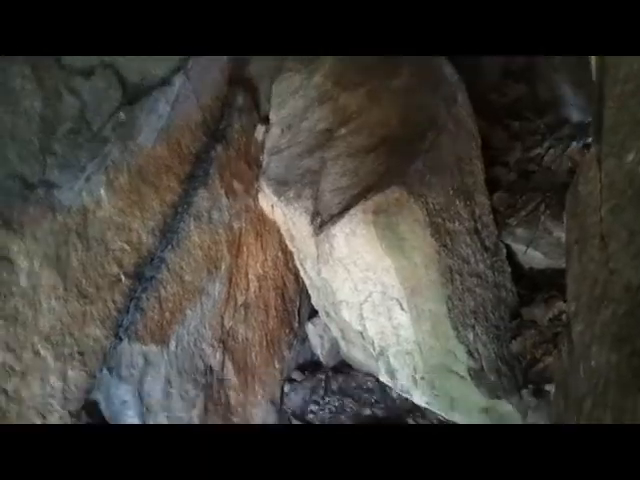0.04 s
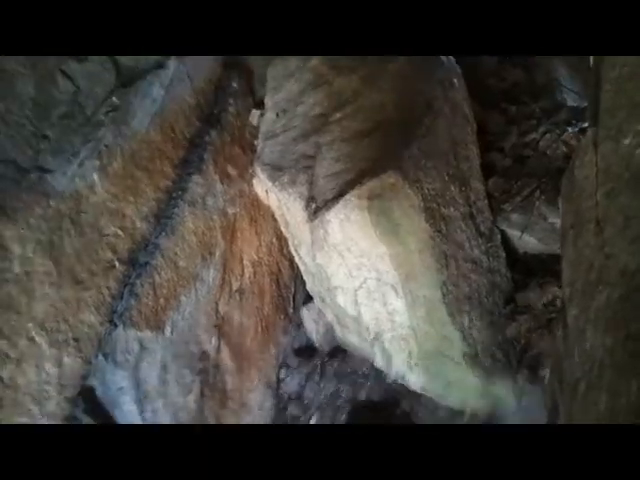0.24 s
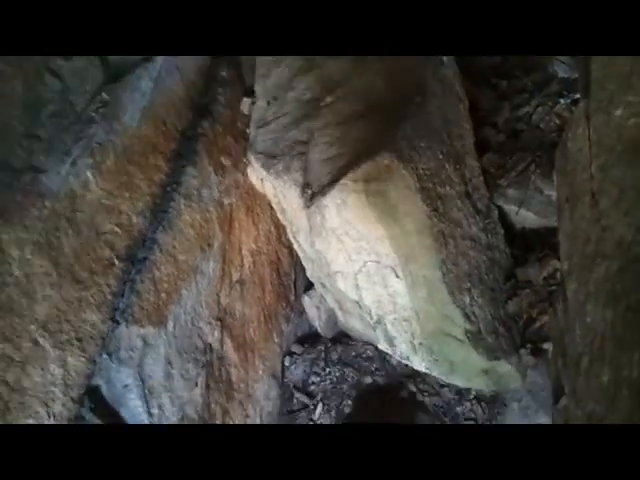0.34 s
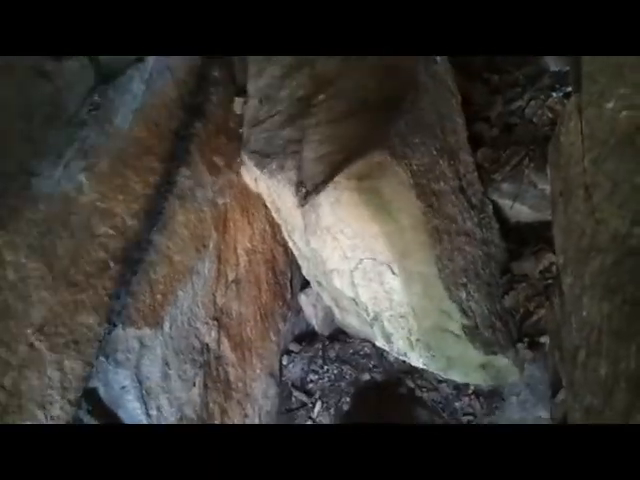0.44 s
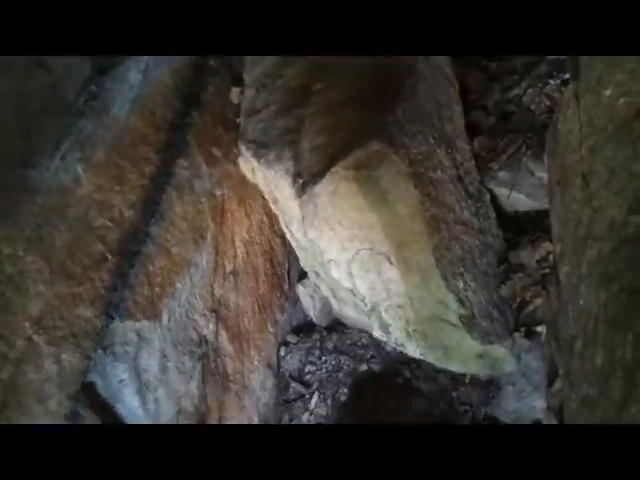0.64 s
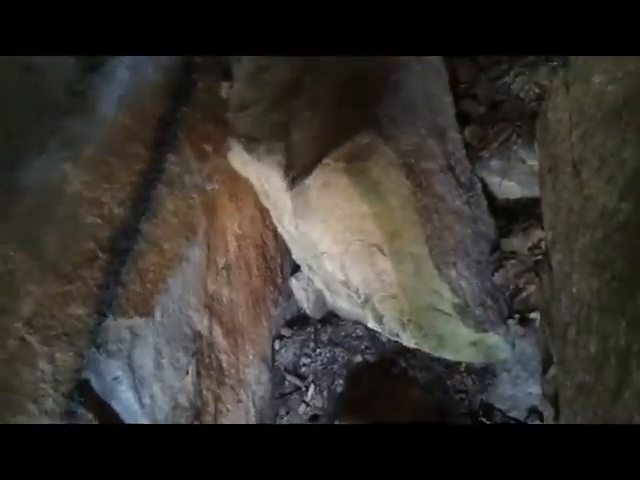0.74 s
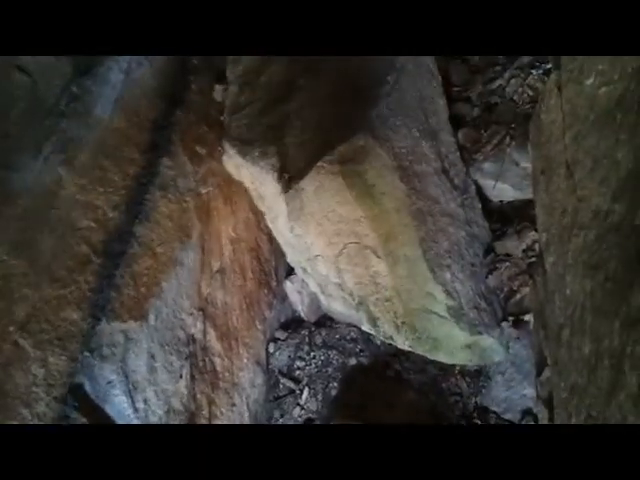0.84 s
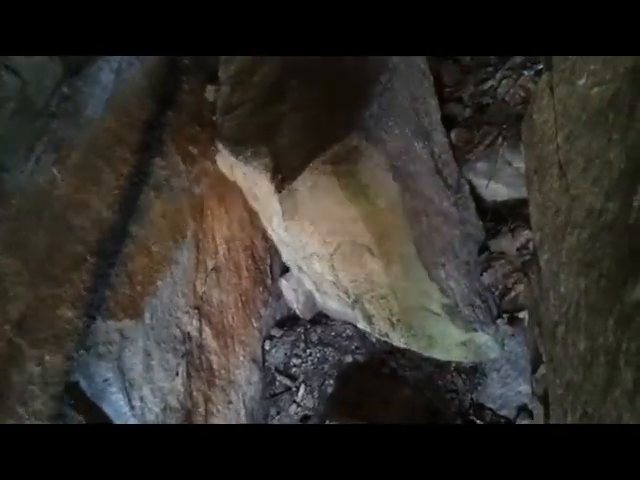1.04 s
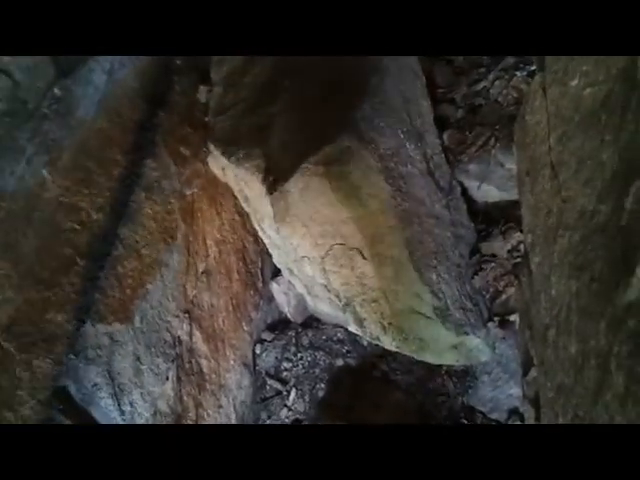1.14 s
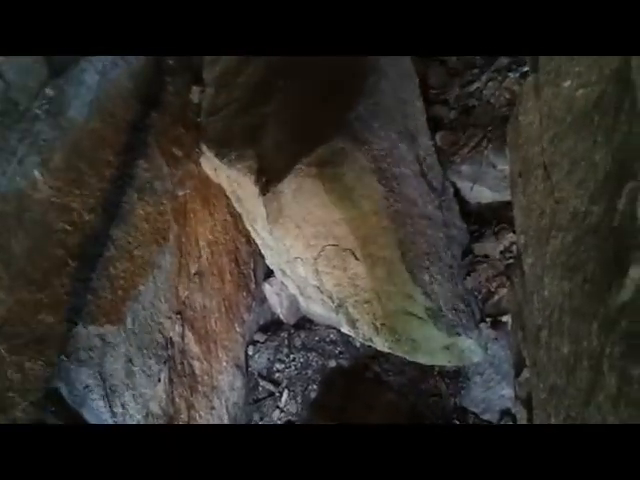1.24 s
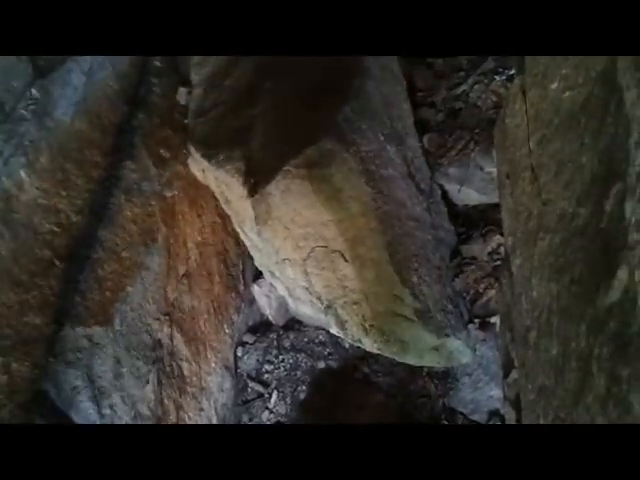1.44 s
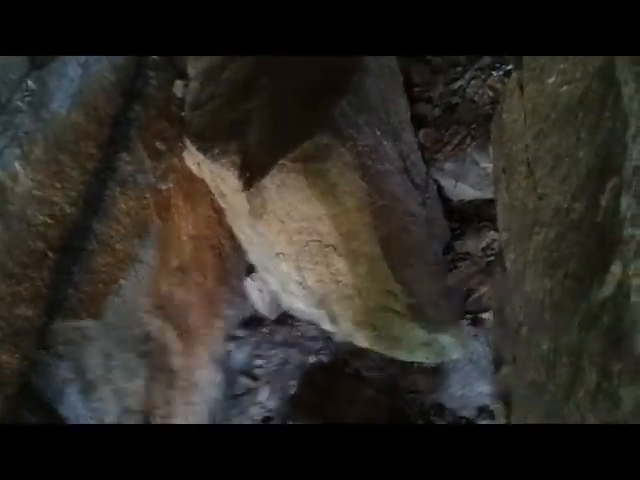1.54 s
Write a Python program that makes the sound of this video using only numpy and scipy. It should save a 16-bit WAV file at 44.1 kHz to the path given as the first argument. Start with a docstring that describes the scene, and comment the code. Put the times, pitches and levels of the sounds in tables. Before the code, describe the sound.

Two short, gritty scuffs with dull bumps sound close by as someone shifts their footing among boulders. Grit and dry leaves crackle between them, then it quietens, with a faint cricket chirping steadily in the outdoor hush.

```python
"""Two short gritty scuffs with dull bumps sound close by, as someone shifts their footing among boulders.
Friction on the rock is a train of tiny impacts, dense in the scuffs and lighter in the slide between them;
the weight coming down excites heavily damped low modes. Grit and dry leaves tick and rustle.
Some way off a cricket chirps steadily by stridulation, over the hush of the outdoors."""
import sys
import numpy as np
from scipy import signal
from scipy.fft import rfft, irfft
from scipy.io import wavfile
from scipy.ndimage import uniform_filter1d

SR = 44100
rng = np.random.default_rng(int(sys.argv[2]) if len(sys.argv) > 2 else 0)


def file_out(sig):
    """Save sig as 16-bit WAV at sys.argv[1]."""
    # one column per channel
    cols = np.atleast_2d(sig).T
    # limit, then scale
    lim = np.clip(cols, -1, 1)
    pcm = np.round(lim * 32767).astype(np.int16)
    wavfile.write(sys.argv[1], SR, pcm)


N = 70560

# A sole or hand catching on rock: t/s, hold/s, release time constant/s, level/dB, bass gain/dB
SCUFFS = [(0.2306, 0.0017, 0.00063, -22.5, 4.5), (0.235, 0.0022, 0.0048, -31, 9),
          (0.2642, 0.0036, 0.0024, -12.5, -3.5), (0.2705, 0.0057, 0.0041, -12.5, 0),
          (0.2841, 0.0064, 0.0017, -13, -3), (.293, 0.0038, 0.0022, -20.5, -1.5),
          (0.525, 0.0061, 0.0024, -34.5, 1.5), (0.72, 0.009, 0.0023, -21.5, 0),
          (0.73, 0.0046, .001, -11, 3), (0.7369, 0.0034, 0.0014, -12, -1.5),
          (0.7484, 0.0022, .001, -34, 7.5), (0.752, 0.0019, 0.0054, -26.5, -2.5),
          (.771, 0.002, 0.00094, -27, -18), (0.923, 0.0047, 0.0022, -52, 3.5),
          (1.052, 0.0079, .0015, -42, -29), (1.594, .01, .002, -33.5, -6)]
# The weight coming down: t/s, level/dB, f/Hz
BUMPS = [(0.2286, -25.5, 266), (0.2711, -15, 227), (0.29, -28, 372), (0.373, -44, 70), (0.5229, -26, 161),
         (0.678, -44, 230), (0.709, -35, 297), (.7325, -13.5, 646), (.736, -19.5, 335), (0.74, -22, 242),
         (1.059, -41, 238), (1.062, -46, 80)]
# Modes of a bump: frequency ratio, relative level/dB, T60/s
BUMP_MODES = [(1.0, 3.5, 0.022), (1.7, 1, .018)]
# Snaps of grit and dry leaves: t/s, peak level/dB
TICKS = [(.344, -17.5), (0.378, -14), (0.4186, -12.5), (0.4539, -25.5), (.4797, -30), (0.494, -24.5),
         (0.5052, -19.5), (.529, -18), (0.5356, -20), (0.5526, -22.5), (0.5627, -23), (0.6038, -25),
         (0.7007, -33), (.712, -13), (.7496, -5), (0.77, -20.5), (0.929, -32.5), (1.028, -37.5),
         (1.058, -29), (1.3583, -38), (1.4655, -28.5)]
# Soft rubs on rock: t/s, hold/s, release time constant/s, level/dB, centre f/Hz
BRUSHES = [(0.304, 0.025, 0.011, -41, 2830), (0.669, 0.0092, 0.0065, -41, 2760),
           (0.671, .012, 0.0089, -51.5, 1020), (1.12, 0.0061, 0.006, -50.5, 1050),
           (1.275, 0.0058, 0.041, -47.5, 1080), (1.52, 0.024, 0.0091, -52, 503),
           (1.53, 0.017, 0.011, -55, 2900), (1.535, 0.022, 0.011, -45, 1110)]
# Cricket chirps: t/s, level/dB
CHIRPS = [(-.065, -43), (.225, -45.5), (.522, -44.5), (.79, -49), (1.072, -45.5), (1.38, -42.5)]
# The three wing strokes of a chirp: relative level/dB
STROKE_DB = [-3, 1.5, 1]

# Envelopes of the sustained sounds: t/s, level/dB
SLIDE_LEVEL = [(.296, -48), (.303, -40), (.34, -41), (.36, -30.5), (.378, -28.5), (.385, -34.5),
               (.394, -26), (.41, -32), (.424, -26.5), (.437, -43), (.475, -49.5), (.5, -49)]
RUSTLE_LEVEL = [(0, -70), (.055, -55.5), (.1, -66), (.42, -55), (.46, -66), (.51, -54), (.556, -41),
                (.59, -63), (.65, -62), (.72, -39), (.76, -36.5), (.79, -59.5), (.91, -62.5), (.93, -53.5),
                (.95, -68), (1.42, -65), (1.47, -52), (1.6, -49.5)]
HUSH_LEVEL = [(0, -58), (.18, -56.5), (.6, -53), (.88, -52.5), (1.04, -55.5), (1.38, -60), (1.6, -51)]
HISS_LEVEL = [(0, -63.5), (.19, -59), (.5, -52), (.9, -57.5), (1.351, -59), (1.6, -57.5)]

# Spectral densities of the sources: f/Hz, relative level/dB
SCUFF_SPECTRUM = [(30, -10.5), (100, -10), (230, -6.5), (380, -5.5), (550, -9.5), (800, -5.5), (1020, -9.5),
                  (1300, -1), (1500, -7.5), (1800, -3), (2100, -5.5), (2600, -2.5), (3100, -5), (3500, -13),
                  (4150, -2.5), (4500, -4), (5700, 0.5), (6900, -1.5), (7800, -10), (9300, -14.5),
                  (10300, -29), (11000, -59)]
SLIDE_SPECTRUM = [(24, -40), (40, -16), (146, -19), (238, -7.5), (439, -4), (506, -12.5), (828, -6.5),
                  (1390, -8.5), (2120, -2.5), (3640, -9.5), (5680, 0), (8880, -17.5), (11000, -41),
                  (14300, -81), (22000, -120)]
TICK_SPECTRUM = [(100, -8.5), (1000, -7.5), (2600, -3), (3500, -8), (5000, 2.5), (6500, 4.5), (8000, -6),
                 (9500, -11), (10300, -23), (11000, -39)]
HUSH_SPECTRUM = [(20, -53), (40, -18.5), (180, -6.5), (280, -5.5), (400, -3.5), (700, -6), (1000, -3.5),
                 (1330, 0), (1600, -16.5), (2000, -14), (4000, -26), (11000, -52)]
HISS_SPECTRUM = [(200, 0), (1500, -5.5), (2500, -1), (3600, 0.5), (4200, -4), (5500, -0.5), (6800, -1),
                 (8000, -8), (9400, -14.5), (10300, -37), (11000, -33)]
FAR_CRICKET_SPECTRUM = [(3500, -77), (4400, -1), (4600, 12), (4770, 9), (4950, -12), (5150, -1),
                        (6000, -40.5)]


def scuffs(rise_s=0.0015, split_hz=3450):
    """Granular friction: each catch crushes grit in a burst of impacts, with its own share of bass."""
    grit = coloured(grains(per_s=16000, spread_db=1.94), SCUFF_SPECTRUM)
    bass = signal.sosfiltfilt(signal.butter(2, split_hz, fs=SR, output="sos"), grit)
    out = np.zeros(N)
    for start, hold, fall, db, bass_db in SCUFFS:
        balanced = grit + (from_db(bass_db) - 1) * bass
        out += from_db(db) * envelope(start, hold, rise_s, fall) * balanced
    return out


def bumps(contact_s=0.0013, low_edge_ratio=0.69):
    """Damped vibration: a soft contact excites modes that die quickly and radiate little below pitch."""
    out = np.zeros(N)
    t = np.arange(SR // 8) / SR
    push = 1 - np.exp(-(t / contact_s) ** 2)
    for start, db, hz in BUMPS:
        ring = sum(from_db(mode_db) * decay(t, t60) * np.sin(2 * np.pi * hz * ratio * t)
                   for ratio, mode_db, t60 in BUMP_MODES)
        low_cut = signal.butter(2, hz * low_edge_ratio, "high", fs=SR, output="sos")
        at = int(start * SR)
        out[at:at + len(t)] += from_db(db) * signal.sosfilt(low_cut, push * ring)
    return out


def slide():
    """Roughness noise: a lighter drag strikes the grain of the stone in many small contacts."""
    contacts = level(SLIDE_LEVEL) * grains(per_s=7000, spread_db=3)
    return coloured(contacts, SLIDE_SPECTRUM)


def ticks_and_rustle(tail_s=0.0012, tail_db=-22):
    """Impulsive excitation: grit and leaves snap, with brief crumbling tails, over rustling litter."""
    snaps = np.zeros(N)
    for start, db in TICKS:
        snap = from_db(tail_db) * rng.standard_normal(N) * np.exp(-clock() / tail_s)
        snap[0] = 1  # the impulse ahead of the tail
        at = int(start * SR)
        snaps[at:] += from_db(db) * snap[:N - at]
    rustle = level(RUSTLE_LEVEL) * grains(per_s=2200, spread_db=4.5)
    response_peak = np.abs(response(TICK_SPECTRUM)).max()
    return coloured(snaps / response_peak + rustle, TICK_SPECTRUM)


def brushes(rise_s=0.0034, half_width_octaves=0.36):
    """Resonant filtering: each soft rub is friction noise gathered round one broad resonance."""
    out = np.zeros(N)
    for start, hold, fall, db, hz in BRUSHES:
        edges = [hz / 2 ** half_width_octaves, hz * 2 ** half_width_octaves]
        band = signal.butter(2, edges, "band", fs=SR, output="sos")
        rub = unit_rms(signal.sosfilt(band, rng.standard_normal(N)))
        out += from_db(db) * envelope(start, hold, rise_s, fall) * rub
    return out


def cricket(pitch_hz=4970, sag_hz=460, stroke_s=0.02854, step_s=0.042, scatter_t60_s=0.28, scatter_db=2.5):
    """Stridulation: each stroke's tone droops as the wing slows, and trees and rocks scatter it."""
    t = np.arange(SR // 2) / SR
    progress = np.minimum(t / stroke_s, 1)
    swell = np.sin(np.pi * progress ** 0.57)  # peaks early in the stroke
    hz = pitch_hz - sag_hz * progress ** 2.79
    tone = swell * np.sin(2 * np.pi * np.cumsum(hz) / SR)
    out = np.zeros(N + 2 * SR)  # a second of margin at each end
    for start, db in CHIRPS:
        for k, stroke_db in enumerate(STROKE_DB):
            rasp = unit_rms(uniform_filter1d(rng.standard_normal(len(t)), size=150))
            stroke = tone * (1 + 0.15 * rasp)
            reflections = rng.standard_normal(len(t)) * decay(t, scatter_t60_s)
            scatter = signal.fftconvolve(stroke, reflections)[:len(t)]
            scatter *= from_db(scatter_db) * np.linalg.norm(stroke) / np.linalg.norm(scatter)
            at = SR + int((start + k * step_s) * SR)
            out[at:at + len(t)] += from_db(db + stroke_db) * (stroke + scatter)
    return out[SR:SR + N]


def background(far_crickets_db=-64):
    """Incoherent addition: a dull hush, a thin hiss and far crickets blurred into a band of noise."""
    hush = level(HUSH_LEVEL) * coloured(rng.standard_normal(N), HUSH_SPECTRUM)
    hiss = level(HISS_LEVEL) * coloured(rng.standard_normal(N), HISS_SPECTRUM)
    far_crickets = from_db(far_crickets_db) * coloured(rng.standard_normal(N), FAR_CRICKET_SPECTRUM)
    return hush + hiss + far_crickets


def grains(per_s, spread_db):
    """Shot noise: tiny contacts at random times and of uneven size, at unit rms."""
    sizes = from_db(spread_db * np.minimum(rng.exponential(1, N), 5))
    signs = rng.choice([-1, 1], N)
    struck = rng.random(N) < per_s / SR
    return unit_rms(sizes * signs * struck)


def response(spectrum, size=4096):
    """Minimum phase: folding the cepstrum gives a spectrum's causal impulse response, at unit energy."""
    hz, db = np.transpose(spectrum)
    grid_hz = np.maximum(np.arange(size // 2 + 1) * SR / size, 1)
    magnitude = from_db(np.interp(np.log(grid_hz), np.log(hz), db))
    cepstrum = irfft(np.log(magnitude))
    cepstrum[1:size // 2] *= 2
    cepstrum[size // 2 + 1:] = 0
    impulse = irfft(np.exp(rfft(cepstrum)))
    return impulse / np.linalg.norm(impulse)


def coloured(x, spectrum):
    """Convolution imposes a spectrum on a sound."""
    return signal.fftconvolve(x, response(spectrum))[:N]


def level(points):
    """Gain interpolated in decibels between points (t/s, level/dB); silence outside them."""
    times, db = np.transpose(points)
    return from_db(np.interp(clock(), times, db, left=-np.inf, right=-np.inf))


def envelope(start, hold, rise, fall):
    """Exponential growth up to the start, a hold, then exponential decay."""
    t = clock() - start
    return np.exp(np.minimum(t, 0) / rise - np.maximum(t - hold, 0) / fall)


def decay(t, t60):
    """Exponential damping by 60 dB in each t60."""
    return np.exp(-np.log(1000) * t / t60)


def from_db(db):
    """Amplitude ratio of a level in decibels."""
    return 10 ** (np.asarray(db) / 20)


def unit_rms(x):
    """Normalisation to unit mean power."""
    return x / np.sqrt(np.mean(x ** 2) + 1e-20)


def clock():
    """Uniform sampling: t/s of every sample."""
    return np.arange(N) / SR


def scene():
    """Superposition: the pressures of all sources add at one microphone."""
    return (scuffs() + slide() + bumps() + ticks_and_rustle() + brushes() + cricket() + background())[None]


def record(dry, cutoff_hz=11000):
    """Soft saturation rounds the peaks, and a steep low-pass filter limits the bandwidth."""
    low_pass = signal.ellip(10, .2, 80, cutoff_hz, fs=SR, output="sos")
    return signal.sosfilt(low_pass, np.tanh(dry))


dry = scene()
out = record(dry)
file_out(out)
```